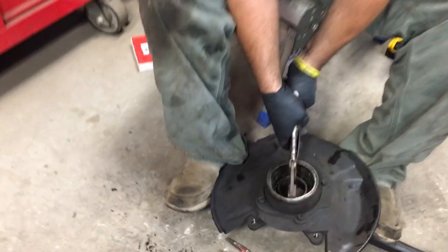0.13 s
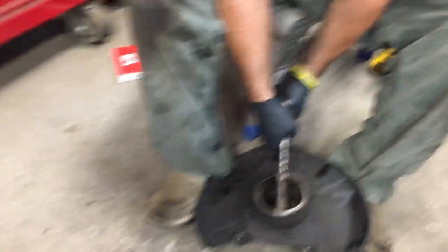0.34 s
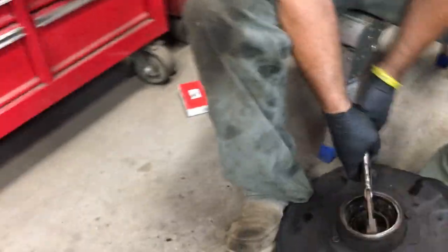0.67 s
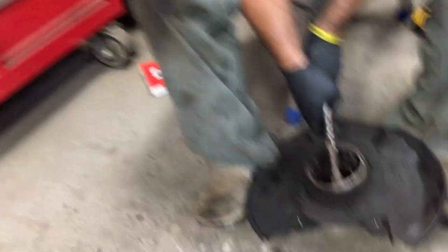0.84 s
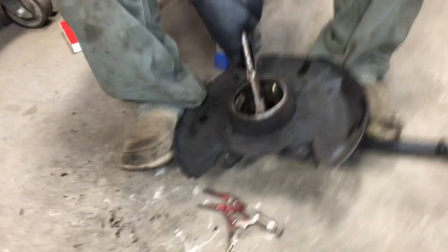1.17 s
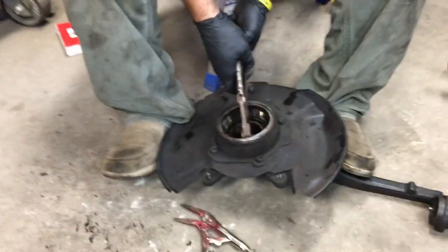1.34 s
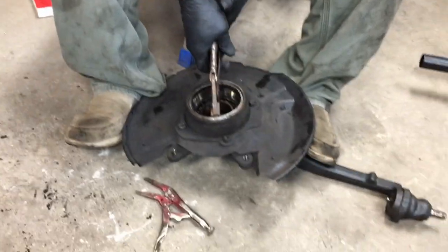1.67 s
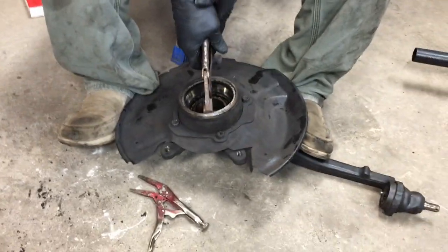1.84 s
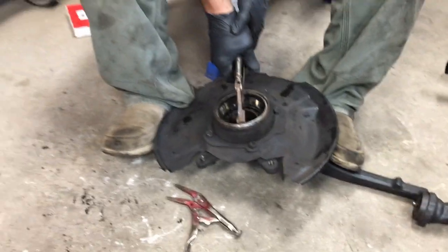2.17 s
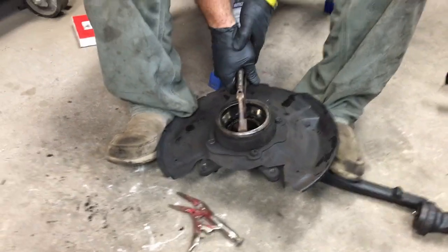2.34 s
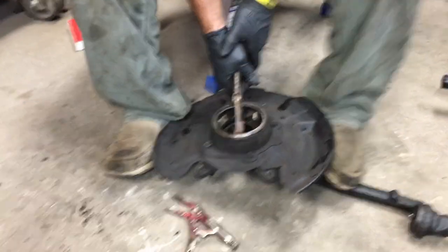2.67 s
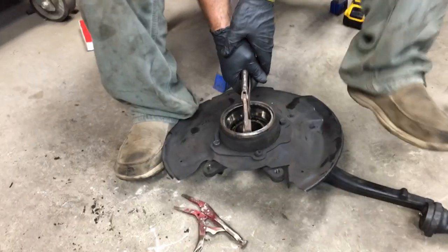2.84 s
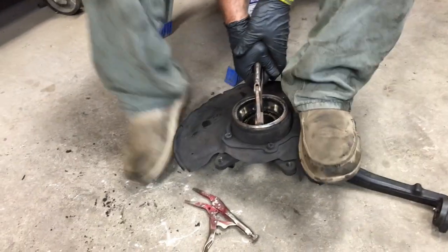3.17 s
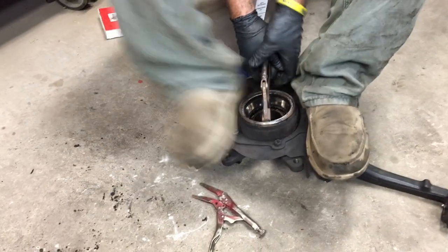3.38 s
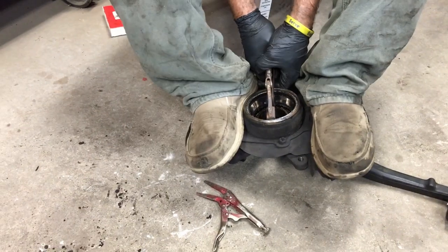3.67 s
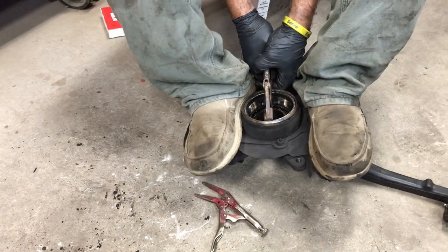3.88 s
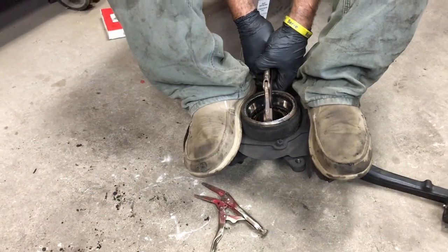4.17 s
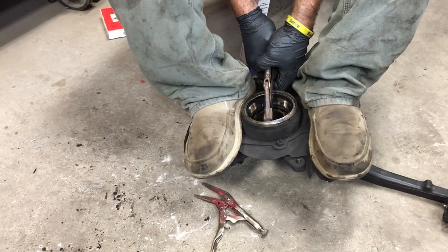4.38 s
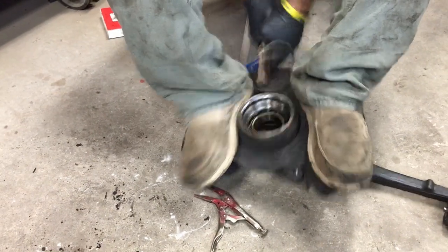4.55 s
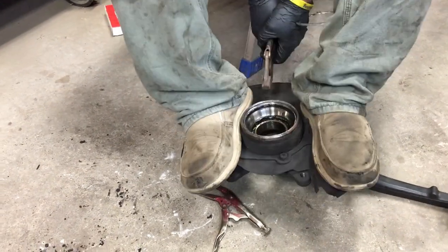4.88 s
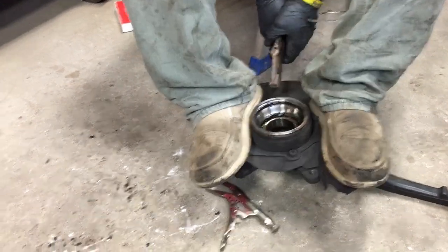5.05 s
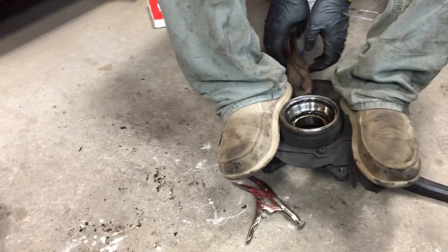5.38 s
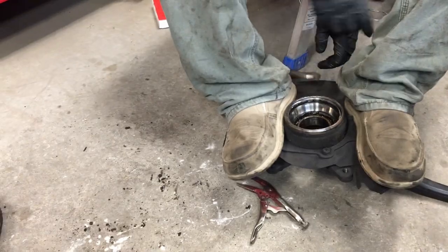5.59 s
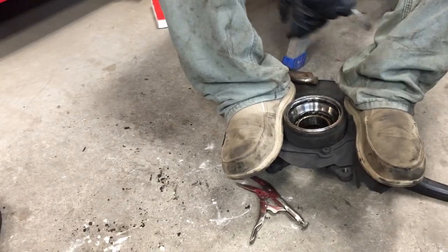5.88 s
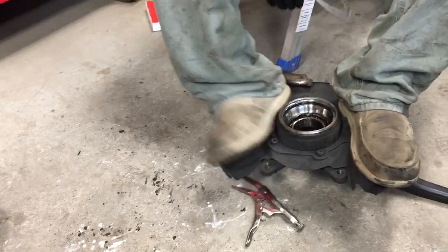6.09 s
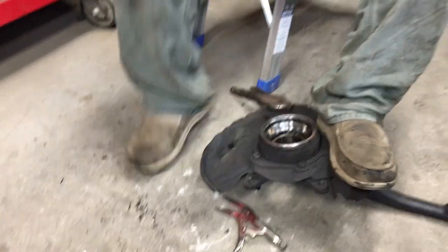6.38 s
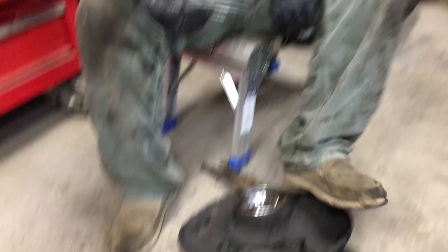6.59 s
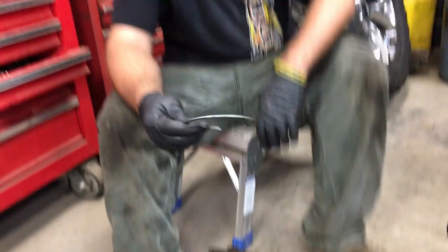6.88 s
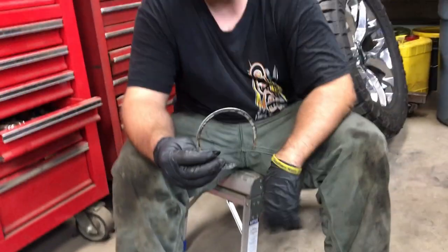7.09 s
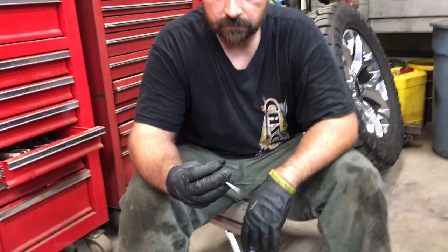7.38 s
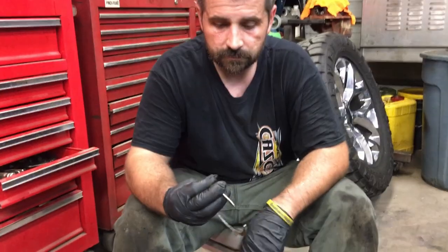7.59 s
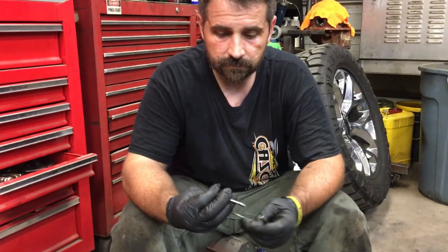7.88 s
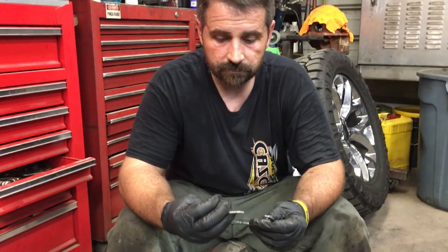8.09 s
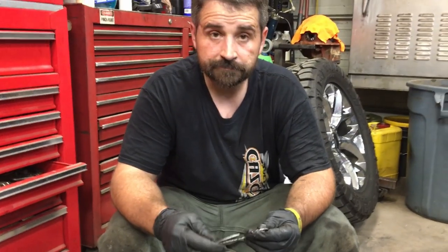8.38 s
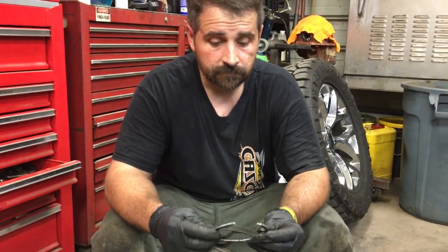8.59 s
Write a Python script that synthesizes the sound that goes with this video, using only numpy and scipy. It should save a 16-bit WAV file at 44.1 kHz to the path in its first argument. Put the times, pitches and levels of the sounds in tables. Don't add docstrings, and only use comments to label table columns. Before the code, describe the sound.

In a concrete garage, a steel punch is tapped, struck in a loud hammer clang, clatters in a hub, then metal drags and rattles to rest.

```python
import sys
import numpy as np
from scipy import signal
from scipy.fft import rfft, irfft, next_fast_len
from scipy.io import wavfile
from scipy.ndimage import map_coordinates

SR = 44100
rng = np.random.default_rng(int(sys.argv[2]) if len(sys.argv) > 2 else 0)


def decibels_to_gain(level_db):
    exponent = np.asarray(level_db, float) / 20
    return 10 ** exponent


def generate_wav(signal):
    frames = np.transpose(np.atleast_2d(signal))
    scaled = np.clip(frames, -1, 1) * 32767
    pcm = np.round(scaled).astype(np.int16)
    wavfile.write(sys.argv[1], SR, pcm)


N = 384993

# pitch in Hz, level in dB, decay t60 in seconds.
SHIELD_MODES = [(227, 12.5, 0.23), (467.6, -7, 0.66), (653, -16, 0.43), (732, 4, 1), (940, -6, 0.3),
                (1040, 9.5, 0.55), (1065, -5, 0.71), (1355, -2.5, 0.2), (1570, 0, 0.3), (1828, 5.5, 0.3),
                (2330, -3.5, 1), (2580, 0.5, 0.19), (3360, 3, .15), (4000, 1.5, 0.19)]
# start in seconds, level in dB, pitch in Hz, chatter t60 in
# seconds.
SHIELD_LANDINGS = [
    (6.921, -12, 773, 0.12),
    (7.08, -12.5, 947, 0.077),
    (7.243, -22, 985, 0.11),
    (7.36, -23, 738, 0.11),
]
# start in seconds, level in dB, pitch in Hz, chatter t60 in seconds.
SHIELD_ROCKS = [
    (7.436, -23.5, 1000, 0.27),
    (7.55, -37, 960, 0.2),
    (7.6, -41, 732, 0.32),
    (7.715, -32.5, 660, 0.065),
    (7.754, -40, 759, 0.26),
    (7.91, -40, 662, 0.1),
    (7.944, -34.5, 750, 0.094),
    (8.064, -49, 984, 0.2),
    (8.181, -49.5, 660, 0.13),
    (8.337, -55, 635, 0.09),
]


def unit(x):
    return x / np.sqrt(np.mean(x ** 2) + 1e-20)


def along(points, hz):
    f, v = np.transpose(points)
    return np.interp(np.log(hz + 1), np.log(f + 1), v)


def fader(rows):
    s, db = np.transpose(rows)
    return decibels_to_gain(np.interp(np.arange(N) / SR, s, db, left=-120, right=-120))


def wobble(rate):
    knots = rng.standard_normal(int(N * rate / SR) + 4)
    return map_coordinates(knots, [np.arange(N) * rate / SR])


def filtered(x, response):
    m = next_fast_len(N + SR // 2)
    return irfft(rfft(x, m) * response(np.fft.rfftfreq(m, 1 / SR)), m)[..., :N]


def noise(spectrum, rough_db=0, rate=300):
    grains = rng.standard_normal(N) * decibels_to_gain(rough_db * wobble(rate))
    return unit(filtered(grains, lambda hz: decibels_to_gain(along(spectrum, hz))))


def resonance(f, hz, width_hz):
    return 1j * f * np.sqrt(width_hz) * 30 / (hz * hz - f * f + 1j * f * width_hz)


def light(events, crack_db, share):
    return [(s, db, 0, thud, crack_db + share * sizzle, sizzle, t60) for s, db, thud, sizzle, t60 in events]


def heavy(events, thud_db, weight, fall_db):
    return [(s, db - 4.5, hz, thud_db - weight * db + 8.5, crack + 4, crack + fall_db, t60)
            for s, db, hz, t60, crack in events]


def alike(events, crack_db):
    return [(*row, crack_db) for row in events]


def struck(events, modes, ring_db, damping, longest, push_db, attack):
    split, twin_gain = 0.015, 0.76
    size, lead = 2 ** 15, 256
    grid_hz = np.fft.rfftfreq(size, 1 / SR)
    t = np.arange(size // 2) / SR
    out = np.zeros(N + size)
    mode_hz = np.transpose(modes)[0]
    bank = np.array([decibels_to_gain(0.55 * db) * resonance(grid_hz, hz, 2.2 * damping / min(t60, longest))
                     for hz, db, t60 in modes])
    jolt = np.exp(-2j * np.pi * grid_hz * (lead / SR + attack))
    for s, db, hz, thud_db, crack_db, sizzle_db, t60 in events:
        grit = decibels_to_gain(2.5 * np.repeat(rng.standard_normal(len(t) // 64), 64))
        decay = decibels_to_gain(-60 * t / max(t60, 0.003)) * (1 - np.exp(-t / attack))
        chatter = grit * rng.standard_normal(len(t)) * decay
        direct = rfft(np.pad(chatter, (lead, 0)), size)
        colour = [(70, thud_db + push_db), (330, thud_db + 2), (750, 0.35 * thud_db), (1300, 0.00807),
                  (2600, 0.53 * crack_db), (4200, crack_db), (9500, sizzle_db), (14000, sizzle_db - 8.5)]

        near_db = 7 * np.exp(-(np.log(mode_hz / (hz + 1)) / 0.24) ** 2) - 2
        strengths = decibels_to_gain(ring_db + near_db + 1.5 * rng.standard_normal(len(modes)))
        strengths = strengths * (-1) ** np.arange(len(modes))
        clang = 1 + (hz > 0) * 1.2 * resonance(grid_hz, hz + 1, 0.058 * hz + 1)

        grip = grid_hz * (1 + 0.005 * rng.standard_normal())
        body = np.interp(grip, grid_hz, strengths @ bank)
        twin_hz = grip * (1 + split * rng.uniform(-1, 1))
        twin_strengths = strengths * rng.standard_normal(len(modes))
        twin = twin_gain * np.interp(twin_hz, grid_hz, twin_strengths @ bank)
        push = 0.7 * np.linalg.norm(chatter) * jolt + 0.6 * direct

        level = decibels_to_gain(db + 8.5 + along(colour, grid_hz))
        out[round(s * SR):][:size] += irfft(level * (clang * direct + (body + twin) * push), size)
    return out[lead:N + lead]


def air():
    # time in seconds, level in dB.
    airflow = [(0, -55), (1.9, -59), (3.3, -57.5), (3.9, -63), (6, -61), (6.6, -59.5), (7.95, -63),
               (8.73, -62)]
    # frequency in Hz, density in dB per Hz.
    rumble_colour = [(13, -49), (22, -31), (41, -5), (59, 0.5), (127, -11), (200, -16.5), (260, -20.5),
                     (400, -100)]
    rush_colour = [(88, -35.5), (150, -10.5), (220, -7), (286, -2.5), (920, -4), (4000, -27), (5200, -48.5),
                   (8800, -120)]
    hiss_colour = [(1500, -32), (2500, -19), (4000, 2), (7000, 2), (10500, -5.5), (13500, -0.5),
                   (16000, -8)]
    flow = fader(airflow)
    rumble = decibels_to_gain(-32) * flow ** 0.3 * noise(rumble_colour, rough_db=-0.2, rate=1.6)
    rush = flow * noise(rush_colour, rough_db=0.5, rate=3.6)
    return rumble + rush + decibels_to_gain(-76.5) * noise(hiss_colour)


def cloth():
    # time in seconds, level in dB.
    sleeve_moves = [(0.0, -58), (0.354, -67), (0.82, -55.5), (0.936, -65), (0.954, -34.5), (1.0, -88),
                    (1.125, -63), (1.15, -70)]
    glove_moves = [(0.96, -59), (1.04, -69), (1.09, -61), (1.125, -60.5), (1.15, -76)]
    # frequency in Hz, density in dB per Hz.
    sleeve_colour = [(880, -50), (1500, -6), (2080, 2), (2410, -7), (3620, -5), (6000, -13.5),
                     (12100, -22.5), (16000, -19)]
    glove_colour = [(2000, -29.5), (5000, -5), (9000, 0), (14000, -1), (16000, -1)]
    sleeve = fader(sleeve_moves) * decibels_to_gain(-5.5) * noise(sleeve_colour, rough_db=-1.5, rate=93)
    return sleeve + fader(glove_moves) * noise(glove_colour, rough_db=-0.5, rate=60)


def slide():
    # time in seconds, level in dB.
    sliding = [(2.606, -75), (2.612, -73), (2.63, -74), (2.651, -70), (2.68, -64), (2.695, -50),
               (2.73, -57), (2.744, -50.5), (2.79, -60)]
    # pitch in Hz, width in Hz, level in dB.
    jingle = [(674, 58, 3), (1070, 73, 2), (1390, 25, -3), (4330, 23, -12.5), (5500, 73, -19.5),
              (5300, 45, -8.5), (5710, 61, -12.5), (6140, 84, -10), (6300, 45, -11), (6870, 84, -15.5),
              (8450, 29, -24.5), (8900, 92, -22), (9240, 34, -22.5), (11900, 89, -15.5)]
    slips = fader(sliding) * unit(rng.standard_normal(N) * decibels_to_gain(3.6 * wobble(120)))
    hz, width_hz, db = np.transpose(jingle)[:, :, None]
    caught = slips * decibels_to_gain(7 * np.array([wobble(22) for _ in jingle]))

    def modes(f):
        return decibels_to_gain(3 + 0.34 * db) * 1j * f * width_hz / (hz * hz - f * f + 1j * f * width_hz)

    sing = filtered(caught, modes).sum(0)
    scrape = filtered(slips, lambda f: 0.21 * f / (f + 900) / (1 + f / 5000))
    return decibels_to_gain(11) * (sing + scrape)


def drag():
    # time in seconds, level in dB.
    pressure = [(6.83, -50), (6.89, -31), (6.985, -34), (7.005, -59), (7.07, -43.5), (7.09, -22.5),
                (7.3, -28), (7.55, -28.5), (7.85, -65)]
    # frequency in Hz, density in dB per Hz.
    grit_colour = [(88, -46.5), (222, -2.5), (328, -4.5), (649, 5.5), (1800, -7.5), (2400, -9),
                   (13700, -39), (16000, -62.5)]
    scrape = fader(pressure)
    grit = scrape * decibels_to_gain(-5 - 32 * np.abs(np.arange(N) / SR - pressure[1][0]))
    grains = noise(grit_colour, rough_db=5.5, rate=61)
    low = unit(filtered(grains, lambda f: 1 / (1 + (f / 2700) ** 4)))
    high = unit(filtered(grains, lambda f: 1 - 1 / (1 + (f / 2700) ** 4)))

    def sheet(f):
        modes = sum((-1) ** k * resonance(f, hz, 4 / min(t60, 0.8))
                    for k, (hz, _, t60) in enumerate(SHIELD_MODES))
        return 0.62 + decibels_to_gain(-15.5) * modes

    return decibels_to_gain(-5.5) * filtered(scrape * low, sheet) + filtered(grit * high, sheet)


def hum():
    # pitch in Hz, level in dB, decay t60 in seconds.
    free_modes = [(475.5, -7, 0.61), (660, 3.5, 1), (730.5, -3, 1.3), (814, -5, 1.2), (924, -11, .7),
                  (978, -2, 0.53), (1073, -9, 0.59), (1110, -2.5, 1.6), (1210, -6, 1.1), (1290, 0.5, 1.1),
                  (1393, -0.5, 0.23), (1520, -8.5, .6)]
    s, db = np.transpose(SHIELD_LANDINGS + SHIELD_ROCKS)[:2]
    shakes = np.bincount(np.round(s * SR).astype(int), decibels_to_gain(db), N)

    def ringing(f):
        return sum((-1) ** k * decibels_to_gain(level) * resonance(f, hz, 1.77 / t60)
                   for k, (hz, level, t60) in enumerate(free_modes))

    return decibels_to_gain(18.5) * filtered(shakes, ringing)


def hops():
    # start in seconds, level in dB, favoured tone in Hz, tick in dB, life as a share of its free ring.
    ring_hops = [
        (5.68, -50, 13330, -6, .6),
        (7.154, -34, 8430, -7, .22),
        (7.156, -37, 13330, -10, .25),
        (7.535, -30, 4550, 4, 0.36),
        (7.537, -34, 9900, -3, .4),
        (7.575, -31, 8430, 8, .4),
        (7.607, -41.5, 13330, -4, 0.61),
        (7.609, -44.5, 8430, -6, 0.95),
    ]
    # pitch in Hz, level in dB, decay t60 in seconds.
    ring_tones = [(4490, -1.5, .37), (4600, -1, 0.17), (6589, 1, .2), (7262, 4, .25), (8460, 4, 0.27),
                  (9350, -3, .3), (9900, 0, .15), (13330, -3, 0.25), (13870, -6, .18)]
    out, t = np.zeros(N + SR), np.arange(SR // 2) / SR
    hz, level_db, t60 = np.transpose(ring_tones)[:, :, None]
    for s, db, tone_hz, tick_db, life in ring_hops:
        octaves_off = np.log2(hz / tone_hz)
        picked_db = level_db + 14.5 * (np.exp(-(octaves_off / 0.15) ** 2) - 1)
        tones = (decibels_to_gain(picked_db - 60 * t / (t60 * life)) * np.sin(2 * np.pi * hz * t)).sum(0)
        tick = decibels_to_gain(tick_db - 60 * t / 0.025) * np.diff(rng.standard_normal(len(t) + 1)) / 2
        out[round(s * SR):][:len(t)] += decibels_to_gain(db) * (tones + tick) * (1 - np.exp(-t / 0.0005))
    return out[:N]


def shield_rattle():
    # start in seconds, level in dB, pitch in Hz, chatter t60 in seconds.
    rattles = [(6.849, -40, 1070, 0.12), (6.882, -19.5, 930, 0.12), (6.934, -16, 970, 0.086),
               (6.95, -19.5, 3360, 0.093), (6.972, -17.5, 1010, 0.064), (7.092, -15.5, 1040, 0.029),
               (7.107, -27.5, 640, 0.55), (7.129, -16.5, 853, 0.049), (7.175, -23.5, 1390, 0.062),
               (7.192, -16.5, 1560, 0.08), (7.258, -19.5, 1040, 0.16), (7.271, -16.5, 3200, 0.12),
               (7.281, -20, 1040, 0.098), (7.295, -25, 2400, 0.085), (7.34, -31.5, 970, 0.19),
               (7.377, -24, 3600, 0.11)]
    # pitch in Hz, level in dB, decay t60 in
    # seconds.
    rim_modes = [(4616, -5.5, .08), (5200, 1, 0.0786), (6240, 18, .08), (6800, 12, .07), (8100, 5, .07),
                 (9200, 0, .07), (11400, -4, .06)]
    lying_ring_modes = [(3770, -1, 0.081), (4468, -14.5, .1), (5170, -1.5, 0.06), (5700, -5.5, 0.082),
                        (6440, 13.5, 0.02), (6860, 8, 0.045), (7849, 7, 0.14), (8650, 1.5, 0.055),
                        (9340, -15, 0.059), (11570, -6, .06), (13500, 8, 0.05), (14560, -3, .07)]
    # start in seconds, level in dB, thud in dB, sizzle in dB, chatter t60 in seconds.
    ping_events = [
        (7.468, -33, -17.5, 14.4, 0.035),
        (7.476, -45, -16.5, 7.8, 0.12),
    ]
    bumps = heavy(alike(rattles, crack_db=-17), thud_db=-29, weight=0.1, fall_db=-12.5)
    landings = heavy(alike(SHIELD_LANDINGS, crack_db=-22), thud_db=-12.5, weight=0, fall_db=-11)
    rocks = heavy(alike(SHIELD_ROCKS, crack_db=-57), thud_db=-30.5, weight=0.79, fall_db=6.5)
    pings = light(ping_events, crack_db=7.5, share=0.7)
    clatter = struck(bumps + landings, SHIELD_MODES + rim_modes,
                     ring_db=-4.5, damping=1.1, longest=0.17, push_db=-10, attack=0.002408)
    rocking = struck(rocks, SHIELD_MODES[:8],
                     ring_db=-7, damping=1, longest=0.197, push_db=1, attack=0.0066)
    pinging = struck(pings, lying_ring_modes,
                     ring_db=0, damping=2.1, longest=0.15, push_db=-13, attack=0.000549)
    return clatter + rocking + pinging


def boots():
    # start in seconds, level in dB, pitch in Hz, chatter t60 in seconds, crack in dB over the level.
    knocks = [
        (3.128, -39, 225, 0.13, -14.5),
        (3.13, -37, 647, 0.059, -27),
        (3.268, -37.5, 732, 0.12, -42),
        (3.275, -34, 1040, 0.072, -37),
        (3.444, -35, 299, 0.028, -16.5),
        (3.447, -45.5, 930, 0.025, -13),
        (3.649, -46, 631, 0.069, -9.5),
        (5.0, -48.5, 577, 0.076, -21),
    ]
    # start in seconds, level in dB, pitch in Hz, chatter t60 in seconds.
    nudges = [
        (2.798, -44.5, 1230, 0.11),
        (6.198, -33, 730, 0.067),
        (6.497, -41, 1620, 0.17),
        (6.528, -45.5, 1761, 0.37),
    ]
    # pitch in Hz, level in dB, decay t60 in seconds.
    pinned_modes = [(225, -1.5, 0.064), (477, -52, 5.0), (732, -5, 0.3), (625, -10.5, 0.26),
                    (730, -28, 0.19), (983, -14, 0.33), (1620, -22, 0.21)]
    events = heavy(knocks, thud_db=-5.5, weight=0.069, fall_db=-6)
    events += heavy(alike(nudges, crack_db=-22.5), thud_db=-40, weight=0.069, fall_db=-4.5)
    return struck(events, pinned_modes,
                  ring_db=7.5, damping=2.4, longest=0.25, push_db=-10, attack=0.00182)


def tinks():
    # start in seconds, level in dB, thud in dB, sizzle in dB, chatter t60 in seconds.
    touches = [
        (0.002, -55.5, -16, 4.5, 0.0052),
        (.234, -48.5, -13, -10.5, 0.016),
        (0.827, -60, -3, 2.5, 0.2),
        (5.161, -54.5, 5, -5.5, 0.15),
    ]
    # pitch in Hz, level in dB, decay t60 in seconds.
    part_modes = [(4590, -4.5, 0.12), (5140, -4, .1), (5630, 15, 0.11), (6100, 9, .1), (6570, 11, .1),
                  (7400, 1.5, .1), (8100, 1, 0.11), (10000, -9, .1), (12330, -2, .1), (14200, -2, .1)]
    return struck(light(touches, crack_db=5, share=1), part_modes,
                  ring_db=-6, damping=2.2, longest=0.3, push_db=3.5, attack=0.00062)


def crunch():
    # start in seconds, level in dB, thud in dB, sizzle in dB over the body, chatter t60 in seconds.
    crunches = [(0.085, -53.5, -6, -17, 0.12), (0.71, -44, -19, -23, 0.06), (0.757, -51, -16, -8, 0.03),
                (0.768, -47, -16, -6, 0.032), (1.468, -64, -20, -4, 0.028), (0.946, -52, -5, -11, 0.037),
                (0.954, -28, 2, -18, 0.022), (1.419, -53, -18, -24, 0.067), (1.525, -51.5, -9, -18, 0.085),
                (1.691, -45, -23, -1.5, 0.048), (1.761, -36.5, -15, -13, 0.17),
                (2.93, -47, -51, -3.5, 0.067), (2.948, -35, -22, -15, 0.19),
                (3.205, -37.5, -14, -13.5, 0.17), (3.533, -48.5, -33, -22, 0.15),
                (3.596, -25.5, -62, -24, 0.076), (3.116, -43.5, -19, -18, 0.29),
                (4.031, -50.5, -19, -33, 0.055), (5.366, -47.5, -14, -15, 0.29),
                (6.161, -36, -7, -13.5, 0.21), (6.258, -24.5, -12, -37, 0.072),
                (6.443, -36.5, 5, -21.5, 0.14), (7.73, -40, 9, -9, 0.093), (3.432, -50, -26, -21, 0.31),
                (7.912, -63, -16, -6, .1), (2.515, -76, -14, 8, .06)]
    # pitch in Hz, level in dB, decay t60 in seconds.
    punch_modes = [(1400, -11.5, .15), (2026, 0, 0.06), (2200, 22, 0.1), (2400, 5, 0.085), (2674, 6, 0.2),
                   (3000, -9, 0.08), (3560, -1, 0.07), (5200, -30, 0.16), (6240, -11, .06),
                   (6770, -20, 0.25), (9074, -0.5, 0.17), (9000, -7, .06), (11260, -16, 0.098)]
    return struck(light(crunches, crack_db=-3, share=0.43), punch_modes,
                  ring_db=-27, damping=0.87, longest=0.35, push_db=-8.5, attack=0.0016)


def drops():
    # start in seconds, level in dB, pitch in Hz, chatter t60 in seconds, crack in dB over the level.
    bounces = [(4.571, -10.5, 680, 0.09, -13.5), (4.731, -18, 580, 0.054, -28),
               (5.410, -6.5, 1250, 0.036, -8), (5.413, -3.5, 690, 0.047, -10),
               (5.463, -6.5, 1620, 0.075, -18), (5.479, -9.5, 1040, 0.09, -4), (5.5, -32, 1620, 0.058, 12),
               (5.604, -18, 980, 0.088, -10.5), (5.627, -12.5, 600, 0.059, -10.5),
               (5.727, -15, 577, 0.1, -10.5), (5.742, -9, 572, 0.042, -14.5),
               (5.801, -24.5, 2024, 0.11, -16.5), (5.837, -31, 1620, 0.048, -7.5)]
    # pitch in Hz, level in dB, decay t60 in seconds.
    tool_modes = [(662, 1.5, 0.07), (1230, -7, 0.093), (2356, -3, 0.22), (3570, -4.5, 0.0725),
                  (3526, -12.5, 0.078), (325, 1, 0.26), (1050, -11.5, 0.57), (1620, 0, 0.31),
                  (1895, -4.5, 0.25), (2080, -17.5, 0.47), (3382, -26, 0.15), (5250, -13, 0.12),
                  (7200, -21, 0.25), (8300, -27, 0.1)]
    return struck(heavy(bounces, thud_db=-21, weight=0.078, fall_db=-5), tool_modes,
                  ring_db=-2, damping=0.79, longest=0.12, push_db=-3.5, attack=0.00064)


def notes():
    # start in seconds, level in dB, pitch in Hz, decay t60 in seconds.
    clear_notes = [(2.241, -23.5, 3600, 0.076), (2.24, -28, 3200, 0.07), (2.242, -28, 1250, 0.13),
                   (3.128, -44, 1600, 0.12), (3.269, -31, 731, 0.16), (3.27, -44, 344, 0.16),
                   (4.545, -36.5, 120, 0.077), (4.572, -19.5, 1040, .1), (4.61, -17.5, 339, 0.26),
                   (4.61, -16, 996, 0.19), (4.61, -18.5, 1615, .15), (4.732, -27, 590, 0.098),
                   (4.732, -34, 205, 0.11), (4.734, -30.5, 990, .15), (5.464, -20, 1618, 0.25),
                   (5.8, -33.5, 850, 0.19)]
    out, t = np.zeros(N + SR), np.arange(SR // 2) / SR
    for s, db, hz, t60 in clear_notes:
        tone = decibels_to_gain(db - 60 * t / t60) * np.sin(2 * np.pi * hz * t)
        out[round(s * SR):][:len(t)] += tone * (1 - np.exp(-t / 0.0011))
    return out[:N]


def taps():
    # start in seconds, level in dB, pitch in Hz, chatter t60 in seconds, crack in dB over the level.
    tap_events = [
        (2.240, -11.5, 2513, 0.025, -7),
        (2.2415, -16.5, 3660, 0.024, -8),
        (2.272, -43.5, 1300, .06, -16.5),
    ]
    # pitch in Hz, level in dB, decay t60 in seconds.
    seated_modes = [(1440, -18.5, .1), (2005, -2.5, 0.064), (2417, -3.5, 0.091), (2680, -8.5, 0.23),
                    (3200, -1.5, 0.09), (3450, -2, .09), (4630, -5.5, .08), (5150, -11, .08),
                    (6230, -8.5, .1), (6680, -4, .1), (9080, -22, .06), (9340, 1.5, .07), (10060, -6, .08),
                    (10900, -1.5, .07)]
    return struck(heavy(tap_events, thud_db=-16, weight=0, fall_db=2), seated_modes,
                  ring_db=0.5, damping=1.5, longest=0.24, push_db=-9, attack=0.000817)


def blows():
    # start in seconds, level in dB, thud in dB, sizzle in dB, chatter t60 in seconds.
    strikes = [
        (4.512, -39.5, -12.5, -16.5, 0.4),
        (4.541, -11.5, -22, -3, 0.09),
        (4.561, -23.5, -12.5, -13.5, 0.064),
    ]
    # start in seconds, level in dB, pitch in Hz, chatter t60 in seconds,
    # crack in dB over the level.
    blow_events = [
        (4.608, -3, 1150, 0.07, -9),
        (4.619, -4, 1560, 0.063, -11),
        (4.643, -7, 1615, 0.05, -11.5),
    ]
    jolt_events = [
        (4.514, -36.5, 700, 0.34, -4),
        (4.541, -10, 1650, 0.02, -13.5),
        (4.546, -3.5, 2050, 0.027, -12.5),
        (4.564, -16, 3430, .05, -1.5),
        (4.575, -14, 2200, 0.032, -10),
    ]
    # pitch in Hz, level in dB, decay t60 in seconds.
    hammer_modes = [(1620, -10, 0.044), (2352, -8, 0.11), (3430, -9, 0.089), (4340, -14, 0.11),
                    (5950, -9, 0.06), (8924, -14, 0.11), (9550, -4.5, 0.036), (11400, 0.5, 0.066),
                    (12330, -0.5, .04), (14000, 5.5, 0.048), (14200, 0.5, 0.063), (15200, 4.5, .1)]
    hub_modes = [(340, -7, 0.15), (651, -9.5, 0.27), (917, -9.5, .1), (1040, -5, .3), (1377, -9, .16),
                 (1560, -4, 0.14), (1830, -5.5, 0.14), (2200, -3.5, 0.15), (2649, -1.5, 0.2),
                 (3200, -9.5, 0.2), (3470, -7.5, 0.18), (4090, -9, 0.18), (5040, -14, 0.2),
                 (5760, -8.5, 0.34)]
    strike = struck(light(strikes, crack_db=-6, share=0.01), hammer_modes,
                    ring_db=4.5, damping=0.86, longest=0.3, push_db=11, attack=0.0014)
    clangs = struck(heavy(blow_events, thud_db=-14, weight=0.018, fall_db=-2.5), hub_modes,
                    ring_db=-4.5, damping=1.7, longest=0.45, push_db=-9, attack=0.0008)
    jolts = struck(heavy(jolt_events, thud_db=-17, weight=0, fall_db=-13), hub_modes[1:],
                   ring_db=-5, damping=0.69, longest=0.3, push_db=3.5, attack=0.00071)
    return strike + clangs + jolts


def garage(x):
    # frequency in Hz, reverberation t60 in seconds.
    room_decay = [(150, 0.81), (1000, 0.52), (4000, 0.48), (9000, 0.43), (15500, 0.27)]
    hz, t, z = signal.stft(rng.standard_normal(SR), SR, nperseg=256)
    dying = z * decibels_to_gain(-60 * t / along(room_decay, hz)[:, None])
    tail = signal.istft(dying, SR, nperseg=256)[1]
    return signal.fftconvolve(np.pad(x, (250, 0)), tail / np.linalg.norm(tail))[:N]


def scene():
    punch_and_hub = taps() + tinks() + crunch() + blows() + drops()
    shield = boots() + shield_rattle()
    ringing = hops() + hum() + notes()
    metal = punch_and_hub + shield + ringing + slide() + drag()
    return (metal + decibels_to_gain(-10) * garage(metal) + air() + cloth())[None]


def low_pass(x):
    return signal.sosfilt(signal.butter(12, 16780, fs=SR, output="sos"), x)


def record(dry):
    banded = filtered(dry, lambda hz: 1 / (1 + (hz / 15800) ** 120))
    clipped = banded / (1 + np.abs(banded / 1.02) ** 8) ** (1 / 8)
    return low_pass(clipped)


dry = scene()
out = record(dry)
generate_wav(out)
```